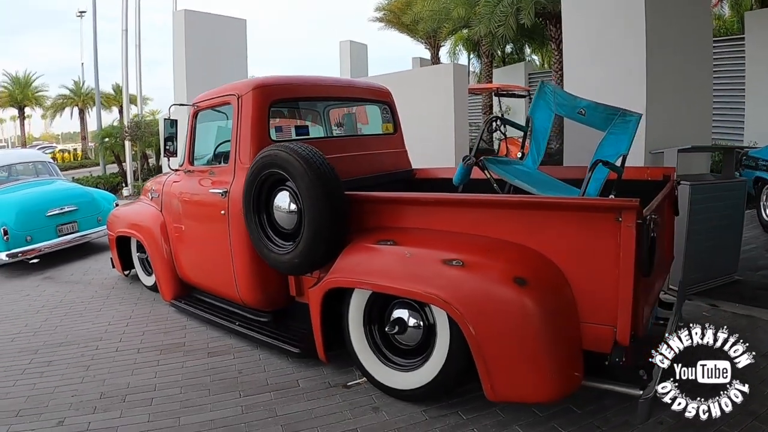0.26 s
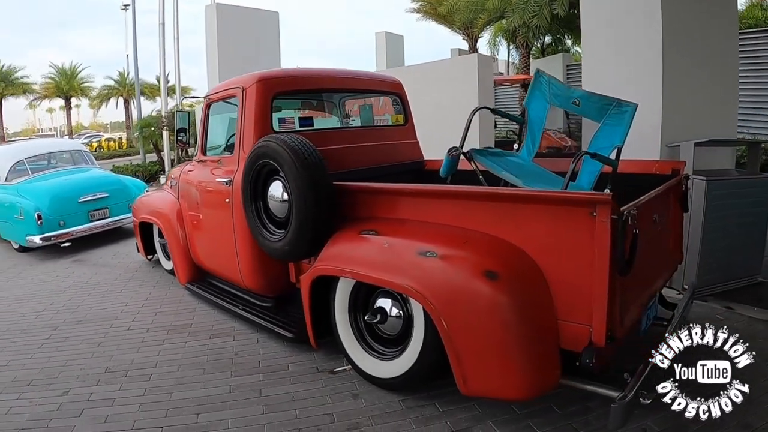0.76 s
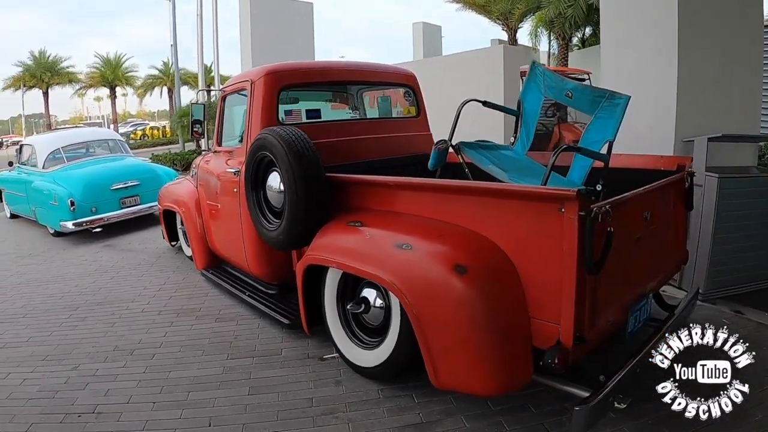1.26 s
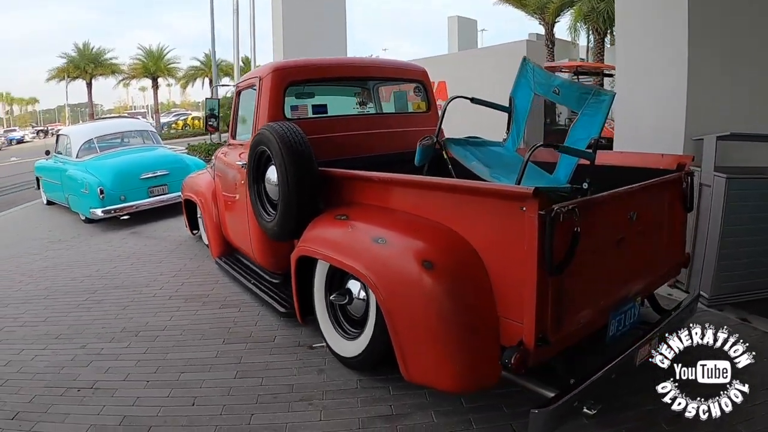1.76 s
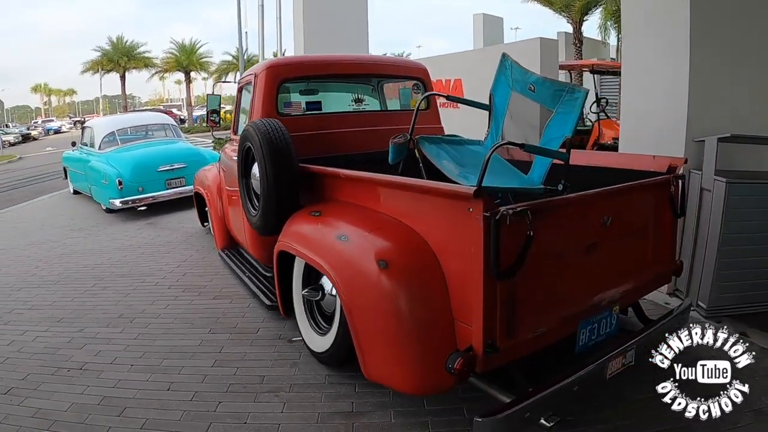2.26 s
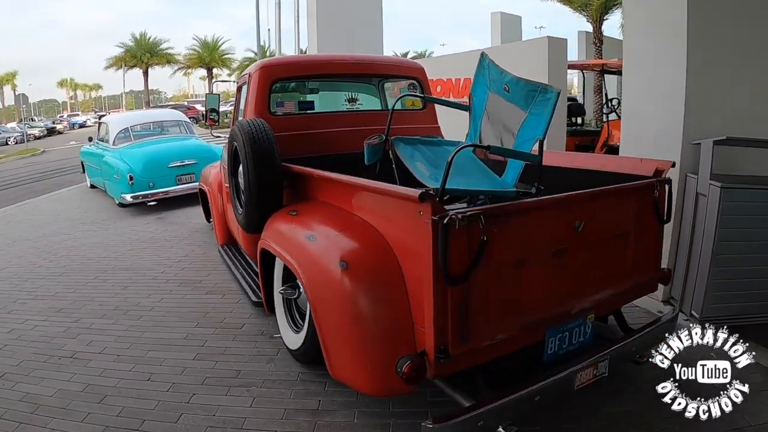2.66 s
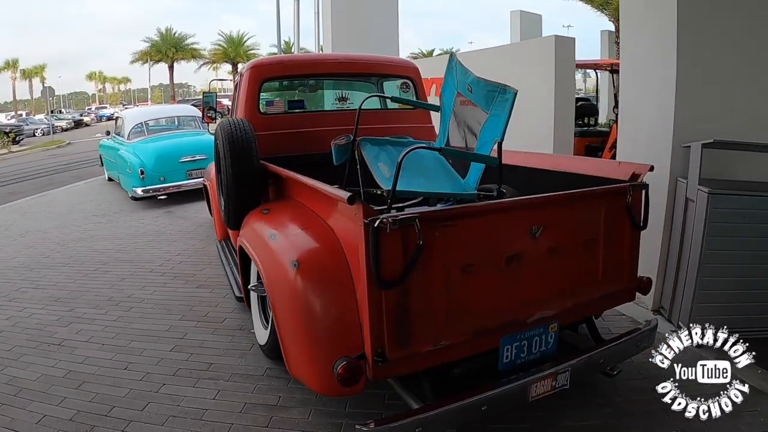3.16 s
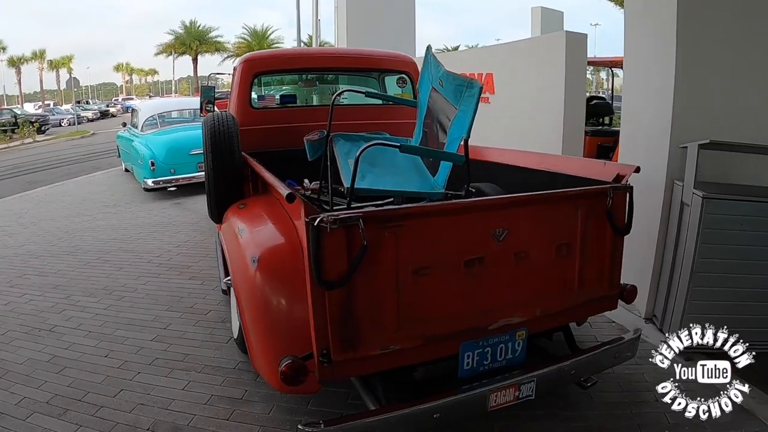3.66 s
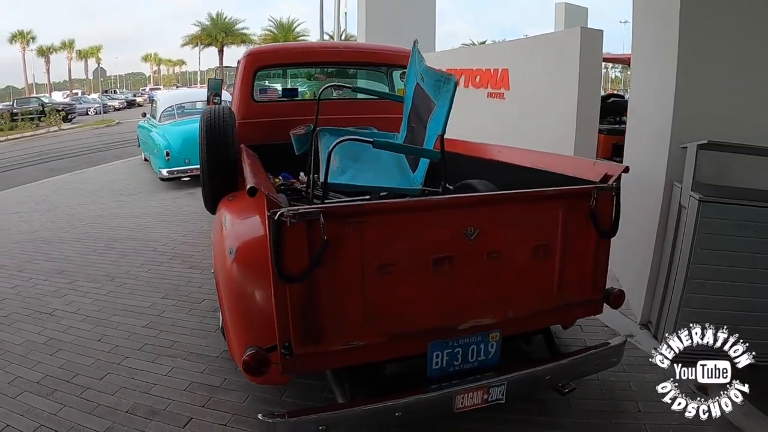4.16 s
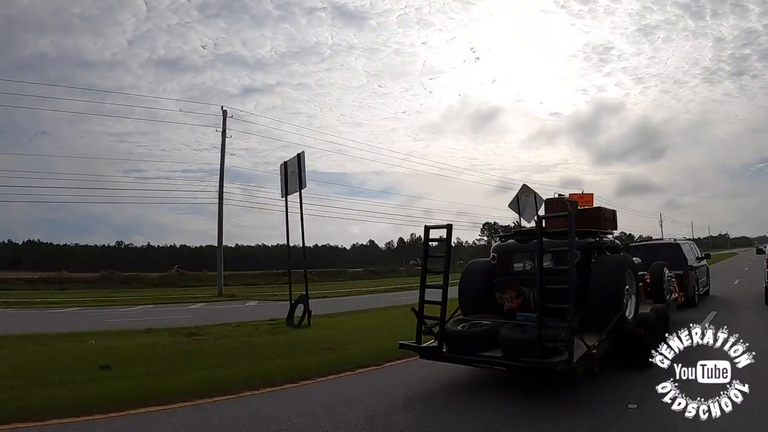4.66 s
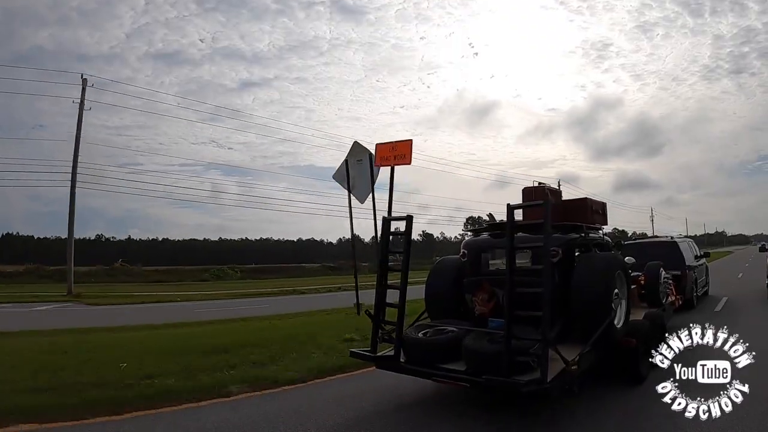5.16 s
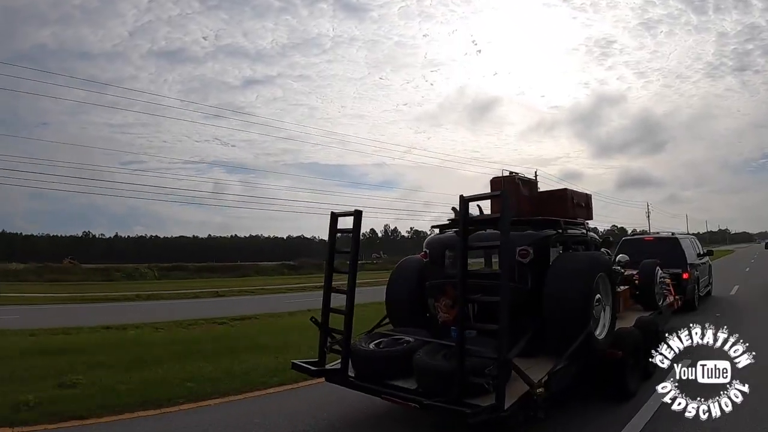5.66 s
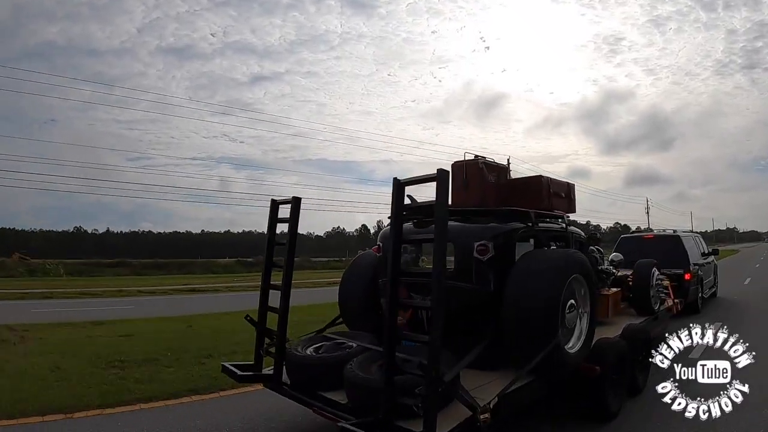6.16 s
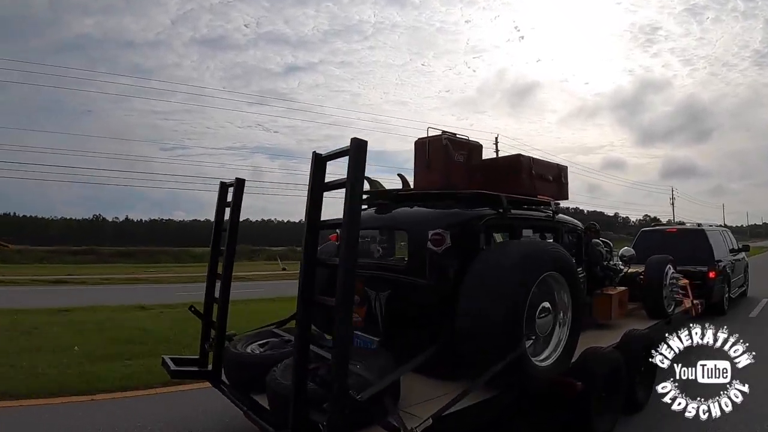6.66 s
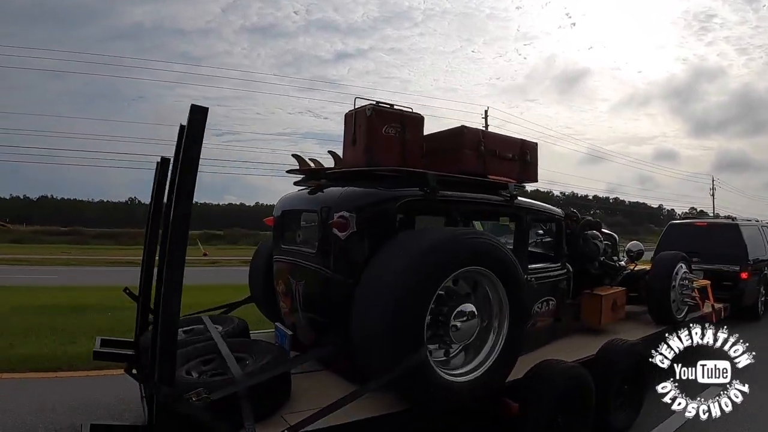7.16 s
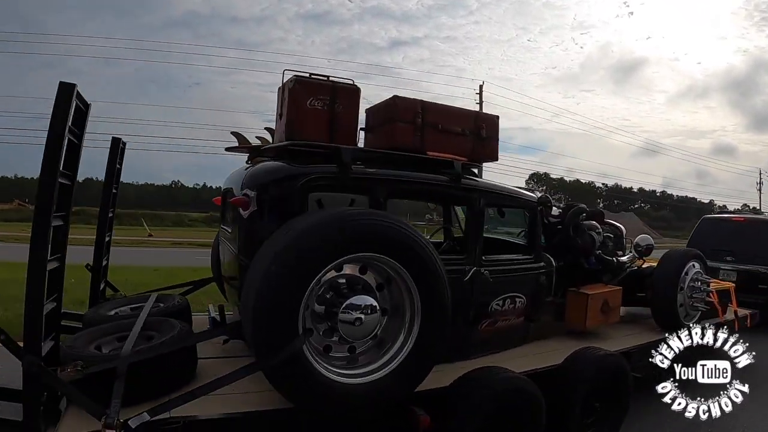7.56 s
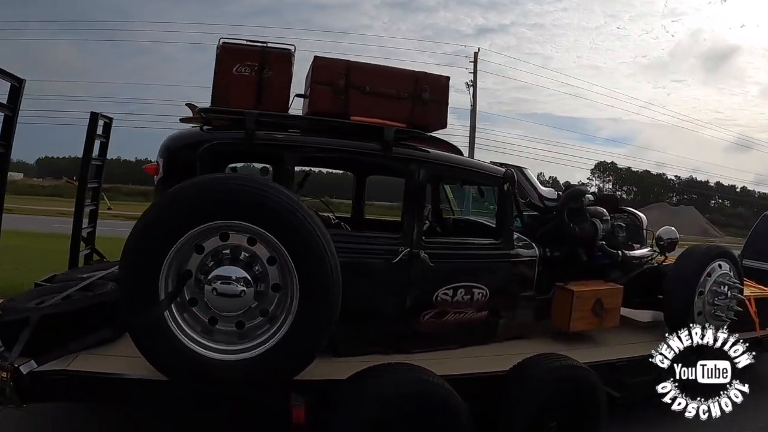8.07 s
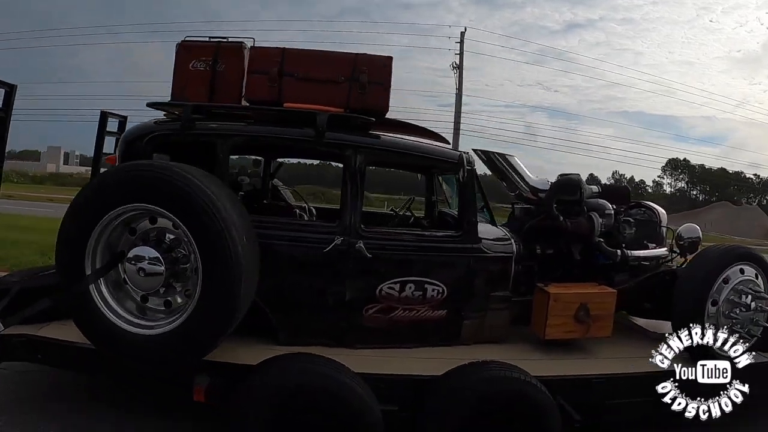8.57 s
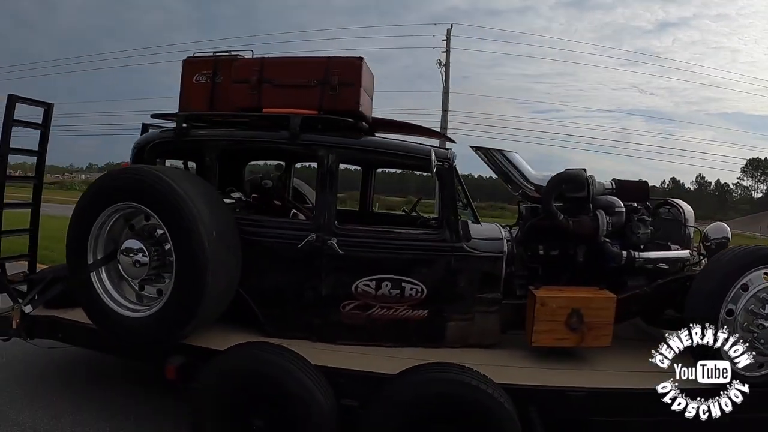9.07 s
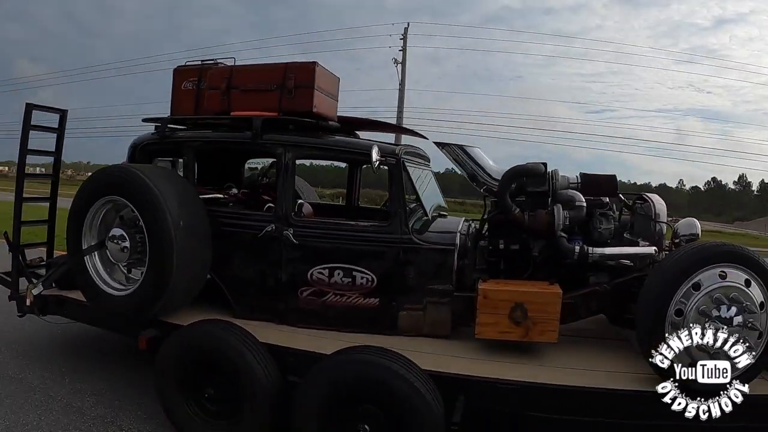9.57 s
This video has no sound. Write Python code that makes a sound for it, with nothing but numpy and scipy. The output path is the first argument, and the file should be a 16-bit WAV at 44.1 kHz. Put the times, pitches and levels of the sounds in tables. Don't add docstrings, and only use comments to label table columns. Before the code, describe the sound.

Steady low idle hum with cart rattle, faint clacks and a hollow bang, a brief silence, then loud wind thumping the microphone over tyre roar.

```python
import sys
import numpy as np
from scipy import signal
from scipy.fft import rfft, irfft
from scipy.io import wavfile
from scipy.ndimage import uniform_filter1d

SR = 44100
rng = np.random.default_rng(int(sys.argv[2]) if len(sys.argv) > 2 else 0)


def wav_record(signal):
    frames = np.transpose(np.atleast_2d(signal))
    bounded = np.clip(frames, -1, 1)
    quanta = np.round(bounded * 32767).astype(np.int16)
    wavfile.write(sys.argv[1], SR, quanta)


def volts_from_decibels(level):
    exponent = np.asarray(level, float) / 20
    return 10 ** exponent


N = 433062
T = np.arange(N) / SR
CUT_S, FADE_S, FADE_LEN_S = 4.344, 4.496, 0.073


def evened(x):
    return x / np.sqrt(np.mean(x ** 2) + 1e-20)


def read(points, hz):
    f, value = np.transpose(points)
    return np.interp(np.log(hz + 1), np.log(f + 1), value)


def columns(rows):
    s, *cols = np.transpose(rows)
    return [np.interp(T, s, c) for c in cols]


def add(mix, s, sound):
    part = mix[round(s * SR):][:len(sound)]
    part += sound[:len(part)]


def wobble(top_hz):
    hz = np.fft.rfftfreq(N, 1 / SR)
    noise = rfft(rng.standard_normal(N))
    return evened(irfft(noise * (hz > 0) / (1 + (hz / top_hz) ** 4), N))


def colour(x, spectrum, lo_hz, hi_hz):
    hz = np.fft.rfftfreq(N, 1 / SR)
    z = rfft(x) * volts_from_decibels(read(spectrum, hz))
    band = abs(z[(hz > lo_hz) & (hz < hi_hz)])
    return irfft(z, N) * N / np.sqrt(2 * np.sum(band ** 2))


def patchy(patchy_db):
    a, b, patches = rng.standard_normal((N // 128 + 5, 257, 3)).T
    patches = uniform_filter1d(patches, size=6, axis=0)
    patches = evened(uniform_filter1d(patches, size=20, axis=1))
    return signal.istft((a + 1j * b) * volts_from_decibels(patchy_db * patches), nperseg=512, noverlap=384)[1][:N]


def dying_tones(rows, t60, rise_s, level_db):
    t, out = np.arange(SR // 8) / SR, np.zeros(N)
    for s, db, hz in rows:
        envelope = volts_from_decibels(db + level_db - 60 * t / t60) * np.minimum(t / rise_s, 1)
        add(out, s, envelope * np.sin(2 * np.pi * hz * t))
    return out


def puffs(rows, t60, level_db):
    t, out = np.arange(SR // 10) / SR, np.zeros(N)
    for s, db, *_ in rows:
        add(out, s, volts_from_decibels(db + level_db - 60 * t / t60) * rng.standard_normal(len(t)))
    return out


# f/Hz, density level/dB
YARD = [(150, -22), (260, -1.5), (330, -3), (420, -3), (650, -12), (1100, -18), (2900, -28), (5000, -39),
        (7000, -42), (9600, -49.5), (12000, -58), (15200, -87)]
# f/Hz, density level/dB
DRONE = [(15, -40), (30, -17), (55, -8), (90, 0), (200, -1), (300, -8), (500, -40), (900, -120)]


def yard():
    distant = volts_from_decibels(-39.5) * colour(patchy(0.84), YARD, 315, 16000)
    return distant + volts_from_decibels(-41) * colour(patchy(1.2), DRONE, 60, 260)


# t/s, firing rate f/Hz
IDLE = [(0, 77.3), (1.15, 77.2), (1.35, 75.9), (2.25, 75.7), (2.45, 77.4), (3.2, 77.3), (4.34, 76.9)]
# t/s, level/dB
IDLE_DB = [(0.0, -35.5), (0.39, -37), (0.63, -36), (1.66, -34.5), (1.93, -36), (2.55, -35), (2.95, -36),
           (4.06, -33), (4.25, -36), (4.34, -34.5)]
# multiple of the working cycle, level/dB
ORDER_DB = [
    [(1, -47), (2, -47), (3, -39), (4, -25), (5, -26), (6, -26), (7, -24), (8, 0), (9, -11), (10, -19),
     (11, -4), (12, -15), (13, -11), (14, -4), (15, -3), (16, -19), (17, -19), (18, -17), (19, -15),
     (20, -22), (21, -14), (22, -18), (23, -15), (24, -16), (25, -18), (26, -20)],
    [(1, -49), (2, -44), (3, -36), (4, -27), (5, -24), (6, -20), (7, -23), (8, 0), (9, -13), (10, -18),
     (11, -6.5), (12, -17), (13, -13), (14, -6), (15, -8), (16, -21), (17, -13), (18, -16), (19, -12),
     (20, -21), (21, -13), (22, -16), (23, -17), (24, -8.5), (25, -20), (26, -23)],
]
# t/s, share of the second place (0-1)
WALK = [
    (2.25, 0),
    (2.55, 1),
]


def engine():
    turns = np.cumsum(columns(IDLE)[0] / 8) / SR
    place, slow, out = columns(WALK)[0], T[::200], np.zeros(N)
    for (k, first_db), (k, second_db) in zip(*ORDER_DB):
        drift = evened(uniform_filter1d(rng.standard_normal(len(slow)), size=90))
        waver_db = 2.0 * (k != 8) * np.interp(T, slow, drift)
        db = first_db + place * (second_db - first_db) + waver_db
        out += volts_from_decibels(db) * np.sin(2 * np.pi * (k * turns + rng.random()))
    return np.sqrt(2) * volts_from_decibels(columns(IDLE_DB)[0]) * out


# start t/s, rolling time/s, wheel rumble level/dB, rattle level/dB
PUSHES = [
    (0.0, 0.062, -41, -61),
    (0.085, .54, -28.5, -46.5),
    (1.2, 0.035, -37.5, -57),
    (3.64, 0.97, -58.5, -57),
]
# f/Hz, density level/dB
RUMBLE = [(120, -25), (200, -4), (433, -1), (540, -4.5), (689, -7.5), (790, -12.5), (1140, -16),
          (1710, -23.5), (2500, -26.5), (3250, -42), (5500, -120)]
# f/Hz, density level/dB
RATTLE = [(880, -30), (1500, -3.5), (2060, -5), (2390, -1.5), (3660, -2), (4350, -2), (5080, -7.5),
          (6540, -6), (9000, -14.5), (11200, -23.5), (15200, -46)]


def cart():
    rise_s, sag_db_per_s, wheel_fall_db_per_s, rattle_fall_db_per_s = 0.034, 9, 27.5, 44
    rumble, rattle = np.zeros(N), np.zeros(N)
    for s, rolling, rumble_db, rattle_db in PUSHES:
        since, after = T - s, np.maximum(T - s - rolling, 0)
        rise = np.clip(since / rise_s, 0, 1)
        rumble += rise * volts_from_decibels(rumble_db - sag_db_per_s * since - wheel_fall_db_per_s * after)
        rattle += rise * volts_from_decibels(rattle_db - rattle_fall_db_per_s * after)
    wheels = colour(patchy(0.46) * volts_from_decibels(0.73 * wobble(51)), RUMBLE, 204, 845)
    loose = colour(patchy(1.0) * volts_from_decibels(1.1 * wobble(70)), RATTLE, 3400, 10000)
    top = signal.sosfiltfilt(signal.butter(2, 8000, "high", fs=SR, output="sos"), loose)
    sizzle_db = np.minimum(-4.5 + 12 * T, 2)
    loose = loose + (volts_from_decibels(sizzle_db) - 1) * top
    return rumble * wheels + rattle * loose


# t/s, peak level/dB
KNOCKS = [(0.0867, -35.5), (0.1072, -34), (0.1396, -32.5), (0.1705, -29), (0.2479, -31), (0.2853, -34.5),
          (0.3217, -29), (0.3447, -33), (0.4285, -31), (0.472, -27.5), (0.5068, -33), (0.5327, -30),
          (0.5711, -26.5), (0.6126, -29), (0.6545, -34), (0.6959, -38)]
# t/s, peak level/dB, f/Hz
JOLTS = [(0.091, -21, 454), (0.121, -16, 365), (0.203, -13, 441), (0.267, -26, 440), (0.298, -26, 382),
         (0.344, -25, 423), (0.464, -20, 406), (0.534, -15.5, 326), (0.629, -21, 423), (0.69, -23, 423),
         (0.782, -37, 353), (0.806, -31, 315), (0.842, -30, 326)]


def knocks():
    band = signal.butter(2, (1800, 4500), "band", fs=SR, output="sos")
    return signal.sosfilt(band, puffs(KNOCKS, 0.044, -1.5)) + dying_tones(JOLTS, 0.085, 0.003, -4)


# t/s, peak level/dB
TICKS = [(0.0877, -52), (0.0997, -44), (0.1336, -46), (0.3641, -39), (0.4719, -46), (0.5312, -45),
         (0.6121, -40), (0.7966, -49)]


def small_ticks():
    t60, t, out = 0.025, np.arange(SR // 20) / SR, np.zeros(N)
    for s, db in TICKS:
        add(out, s, volts_from_decibels(db - 0.5 - 60 * t / t60) * rng.standard_normal(len(t)))
    return signal.sosfilt(signal.butter(2, (6000, 11500), "band", fs=SR, output="sos"), out)


# t/s, peak level/dB, f/Hz
CLINKS = [(0.0877, -39, 6080), (0.1072, -40, 6200), (0.1323, -34.5, 6200), (0.177, -33, 5700),
          (0.2094, -45.5, 6820), (0.2544, -40, 5680), (0.3212, -34.5, 6290), (0.3644, -34, 6740),
          (0.4294, -37, 5870), (0.4724, -35.5, 7280), (0.5344, -36, 6480), (0.6116, -27.5, 6200),
          (0.6274, -39, 6510), (0.6958, -33.5, 7100), (0.7144, -42, 6440), (0.8194, -48, 5810),
          (1.9994, -47, 6720), (2.4294, -49, 6660), (3.6284, -33, 5960), (3.706, -34.5, 6030),
          (3.7618, -43, 5690), (3.7918, -40, 5820), (3.8552, -41, 5770), (3.9863, -40, 5830)]


def clinks():
    t60, hiss_share = 0.06, 0.41
    t, rings, puff = np.arange(SR // 4) / SR, np.zeros(N), np.zeros(N)
    for s, db, hz in CLINKS:
        spread, noise = rng.uniform(0.97, 1.04, (3, 1)), rng.standard_normal(len(t))
        fall = volts_from_decibels(db - 60 * t / t60) * np.minimum(t / 0.0018, 1)
        modes = np.sin(2 * np.pi * hz * spread * t).mean(0)
        add(rings, s, (1 - hiss_share) * fall * modes)
        add(puff, s, hiss_share * fall * noise)
    bright = colour(puff, RATTLE, 20, 20000) * np.sqrt(np.mean(puff ** 2))
    return rings + 0.93 * bright


# t/s, peak level/dB
CLACKS = [
    (2.4888, -41.5),
    (2.9083, -35.5),
]
# f/Hz, density level/dB
CLINK_TAIL = [
    [(1300, -40), (2200, -16), (3000, 1.5), (4400, -10), (6200, -7), (7200, -20), (10000, -32),
     (15000, -90)],
    [(1300, -41.5), (2400, -3), (3400, -4), (4350, -2), (5000, -15), (5800, -10), (7000, -22),
     (10000, -23.5), (15000, -90)],
]


def clacks():
    ticks, smeared, t = np.zeros(N), np.zeros(N), np.arange(900) / SR
    for (s, db), spectrum in zip(CLACKS, CLINK_TAIL):
        tick = np.zeros(N)
        add(tick, s + 0.00103, np.ones(1))
        tick = colour(tick, spectrum, 20, 20000)
        ticks += volts_from_decibels(db) * tick / abs(tick).max()
    walls = np.exp(-t / 0.006) * rng.choice([-1., 1.], len(t))
    return ticks, signal.oaconvolve(ticks, walls / np.linalg.norm(walls))[:N]


# t/s, peak level/dB
BANGS = [
    (3.617, -11.5),
    (3.647, -16.5),
    (3.664, -21),
]
# f/Hz, level/dB, t60/s
PANEL = [(215, -4.5, 0.16), (337, -0.5, 0.17), (392, 1, 0.14), (436, -4, 0.16), (556, -16.5, 0.041),
         (705, -5, .06), (807, 1, 0.054), (875, -8, 0.066), (1570, -14, 0.043), (1870, -12, .04)]
# f/Hz, density level/dB
CRACK = [(150, -43), (280, -2), (400, -1.5), (600, -4.5), (850, -3), (1100, -19.5), (1900, -20.5),
         (3000, -37), (5000, -41), (9000, -64), (15000, -120)]


def bang():
    t, rings, cracks = np.arange(SR) / SR, np.zeros(N), np.zeros(N)
    for s, db in BANGS:
        phase, noise = rng.random(len(PANEL)), rng.standard_normal(len(t))
        modes = np.zeros(len(t))
        for (hz, mode_db, t60), p in zip(PANEL, phase):
            modes += volts_from_decibels(mode_db - 60 * t / t60) * np.sin(2 * np.pi * (hz * t + 0.3 * p))
        add(rings, s, volts_from_decibels(db - 9.5) * modes * np.minimum(t / 0.005, 1))
        add(cracks, s, volts_from_decibels(db - 8.5 - 60 * t / 0.19) * noise)
    coloured = colour(cracks, CRACK, 20, 20000) * np.sqrt(np.mean(cracks ** 2))
    onset = np.clip((T - BANGS[0][0]) / 0.012 + 0.84, 0, 1) ** 2
    return rings + coloured * onset


# f/Hz, t60/s
ROOF = [(250, 0.93), (900, 1.55), (3000, 1.3), (8000, 0.83)]


def roof(x):
    taps = np.zeros(SR)
    at = np.arange(400, SR - 20, 20)
    taps[at + rng.integers(0, 20, len(at))] = rng.choice([-1., 1.], len(at))
    hz, t, z = signal.stft(taps, SR, nperseg=256)
    decay = volts_from_decibels(-60 * t / read(ROOF, hz)[:, None])
    tail = signal.istft(z * decay, SR, nperseg=256)[1]
    return signal.fftconvolve(x, tail / np.linalg.norm(tail))[:N]


def forecourt():
    small, loud, (ticks, smeared) = clinks(), bang(), clacks()
    echoes = roof(volts_from_decibels(-7.5) * small + volts_from_decibels(-3.5) * loud + volts_from_decibels(16.5) * ticks)
    return yard() + engine() + cart() + small + loud + volts_from_decibels(9) * smeared + echoes


# peak t/s, peak level/dB, half length/s
FLARES = [(4.616, -11, 0.01), (4.823, -16, 0.017), (4.904, -18.5, 0.026), (4.989, -15, 0.0087),
          (5.041, -16, 0.0095), (5.186, -21, 0.02), (5.432, -19, 0.02), (5.503, -13.5, 0.03),
          (5.746, -20, 0.012), (5.793, -23, 0.0084), (6.03, -18, 0.012), (6.204, -16, 0.015),
          (6.236, -14, 0.01), (6.298, -15, 0.012), (6.407, -20, 0.014), (6.496, -19, 0.014),
          (6.638, -14, 0.016), (6.699, -13, 0.012), (6.857, -14, 0.012), (7.066, -11, 0.014),
          (7.498, -20, 0.02), (7.568, -24, 0.013), (7.611, -11, 0.0058), (7.785, -23, 0.018),
          (7.827, -26, 0.0076), (8.002, -26, 0.015), (8.078, -21, 0.016), (8.988, -25, 0.014),
          (9.376, -26, 0.019), (9.557, -25, 0.02)]


def flares():
    u, lift = np.arange(-SR // 20, SR // 20) / SR, np.zeros(N)
    for s, db, half in FLARES:
        width = half * np.where(u > 0, 0.54, 1)
        add(lift, s + u[0], volts_from_decibels(db - 15.5) * np.exp(-(u / width) ** 2))
    return lift


# f/Hz, density level/dB
ROAR = [(59, -31.5), (100, -5), (257, -3.5), (311, -9), (384, -10), (609, -11.5), (784, -8.5), (890, -10.5),
        (1980, -22), (4880, -39.5), (7910, -59.5), (13700, -91.5), (15200, -112)]
# t/s, peak level/dB, f/Hz
SLAPS = [(4.539, -22.5, 604), (4.573, -16.5, 460), (4.714, -15.5, 509), (4.817, -12, 544),
         (4.895, -12, 554), (5.066, -15, 456), (5.096, -15.5, 471), (5.233, -13.5, 535), (5.277, -14, 465),
         (5.406, -14, 615), (5.503, -13, 455), (5.574, -14.5, 482), (5.785, -15.5, 710),
         (5.834, -12.5, 510), (6.061, -14, 705), (6.188, -11.5, 455), (6.287, -10, 458),
         (6.355, -15.5, 471), (6.427, -10, 501), (6.536, -12, 674), (6.62, -10, 703), (6.839, -13.5, 479),
         (7.012, -16, 448), (7.127, -15, 824), (7.604, -11.5, 480), (7.798, -16, 790), (8.051, -13, 457),
         (8.405, -13.5, 468), (8.504, -13, 630), (8.615, -16.5, 465), (8.671, -10.5, 473),
         (8.887, -17.5, 802), (9.026, -16.5, 574), (9.153, -17.5, 659), (9.373, -18.5, 474),
         (9.618, -15.5, 482)]


def slaps():
    t60 = 0.038
    puff = puffs(SLAPS, t60, -9.5)
    breath = colour(puff, ROAR, 500, 2500) * np.sqrt(np.mean(puff ** 2))
    return dying_tones(SLAPS, t60, 0.0014, -1.5) + breath


# t/s, peak level/dB, f/Hz
THUMPS = [(4.576, -4, 228), (4.762, -12, 353), (4.961, -20, 123), (5.028, -8, 215), (5.093, -0.5, 175),
          (5.773, -8, 178), (5.84, -2, 154), (5.989, -1.5, 377), (6.29, -1.5, 205), (6.406, -0.5, 131),
          (6.579, -10, 210), (6.686, 2, 252), (6.841, -13, 143), (7.006, -5.5, 216), (7.21, 1.5, 298),
          (7.601, -1.5, 221), (7.767, -6, 165), (7.992, -1, 193.5), (8.227, -10, 121), (8.972, -6, 297),
          (9.082, 0.5, 204), (9.199, -4, 253), (9.565, 3.5, 241), (9.614, -0.5, 203), (5.651, -4, 301),
          (6.179, -3, 190), (6.215, -5, 200), (6.43, -7, 230), (6.358, -10, 143), (7.058, 1, 220),
          (7.302, -8, 226), (7.566, 3.5, 307), (8.066, -6, 170), (9.349, -9, 310), (6.6, -4, 200),
          (6.634, -8, 200), (7.078, -5, 230)]


def thumps():
    u, out = np.arange(-1500, 1500) / SR, np.zeros(N)
    for s, db, hz in THUMPS:
        push = np.cos(2 * np.pi * (hz * u + rng.random()))
        add(out, s + u[0] + 0.00688, volts_from_decibels(db - 6.5) * push * np.exp(-(u * hz / 0.95) ** 2))
    return out


# t/s, level/dB
GUST = [(4.56, -14.5), (5.0, -15.5), (5.5, -15), (5.9, -16.5), (6.3, -13.5), (6.7, -12.5), (7.07, -12),
        (7.3, -24.5), (7.55, -13.5), (7.75, -18), (8.0, -18.5), (8.3, -21), (8.6, -14.5), (8.9, -23),
        (9.2, -16), (9.5, -22.5), (9.82, -9.5)]
# t/s, depth/dB, half length/s
LULLS = [(4.866, 6, 0.013), (4.934, 2, 0.012), (5.26, 4, 0.017), (5.553, 12, 0.01), (5.616, 14, 0.021),
         (5.816, 6.5, 0.02), (5.966, 4.5, 0.045), (6.148, 4, 0.017), (6.369, 13, 0.032), (6.564, 7, 0.02),
         (6.672, 7.5, 0.012), (6.738, 19, 0.021), (6.808, 18, 0.025), (6.89, 3.5, 0.049), (6.941, 27, 0.03),
         (6.994, 10, 0.026), (7.108, 6, 0.021), (7.171, 7, 0.021), (7.397, 10, 0.048), (7.467, 6, 0.018),
         (7.69, 6.5, 0.031), (7.904, 13, 0.032), (8.144, 12.5, 0.042), (9.167, 3, 0.017), (9.32, 12, 0.021),
         (9.448, 9.5, 0.052), (9.515, 4, 0.017), (9.638, 2.5, 0.014), (9.755, 12, 0.019),
         (9.813, 12, 0.018)]
# t/s, level/dB
SLIPSTREAM = [(4.56, -54), (4.7, -44.5), (5.65, -43), (5.9, -39), (6.9, -42), (7.2, -41), (7.45, -36.5),
              (7.56, -49), (8.4, -44), (9.82, -44.5)]
# f/Hz, density level/dB
WIND = [(12, -38), (20, -21), (54, -3), (107, 1), (201, 0.5), (287, -1), (325, -1.5), (538, -10.5),
        (691, -17.5), (835, -24.5), (3000, -40), (3900, -48.5), (6600, -120)]
# f/Hz, density level/dB
HISS = [(880, -24), (1500, -7), (2060, -5.5), (4790, -14.5), (8010, -30.5), (15200, -68)]


def highway():
    gust_db = columns(GUST)[0]
    for s, depth_db, half in LULLS:
        gust_db = gust_db - depth_db * np.exp(-((T - s) / half) ** 2)
    gust_db = gust_db - 6 * np.exp(-np.maximum(T - FADE_S, 0) / 0.081)
    over_calm_db = gust_db + 16.5
    roar_db = -29.5 + 0.5158 * (T - FADE_S) + 0.13 * over_calm_db
    hiss_db = columns(SLIPSTREAM)[0] + 0.078 * over_calm_db
    flutter_db = 0.9 * wobble(27) + 2.7 * wobble(120)
    spray = flares()
    wind = colour(patchy(0.95) * volts_from_decibels(flutter_db), WIND, 60, 600)
    roar = colour(patchy(0.54) * volts_from_decibels(0.35 * flutter_db), ROAR, 630, 2400)
    hiss = colour(patchy(0.73) * volts_from_decibels(0.33 * flutter_db), HISS, 2680, 9000)
    roaring = (volts_from_decibels(roar_db - 1) + spray) * roar
    hissing = (volts_from_decibels(hiss_db - 3.5) + volts_from_decibels(-19.5) * spray) * hiss
    return volts_from_decibels(gust_db) * wind + roaring + hissing + thumps()


def scene():
    fade = np.clip((T - FADE_S) / FADE_LEN_S, 0, 1) ** 1.28
    leak = volts_from_decibels(-33 - 700 * np.maximum(T - CUT_S, 0))
    edges = np.clip(np.minimum(T / 0.004, (T[-1] - T) / 0.0007 + 0.4), 0, 1)
    before = forecourt() * np.where(T < CUT_S, 1, leak) + small_ticks() + knocks()
    after = (highway() + slaps()) * fade
    return (edges * (before + after))[None]


def band_limit(x):
    return signal.sosfilt(signal.butter(12, 15330, fs=SR, output="sos"), x)


def record(dry):
    limited = 0.84 * np.tanh(dry / 0.83)
    return band_limit(limited)


dry = scene()
out = record(dry)
wav_record(out)
```